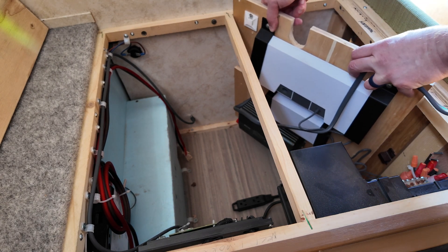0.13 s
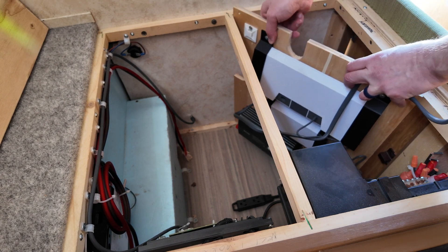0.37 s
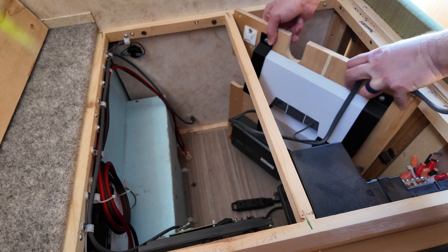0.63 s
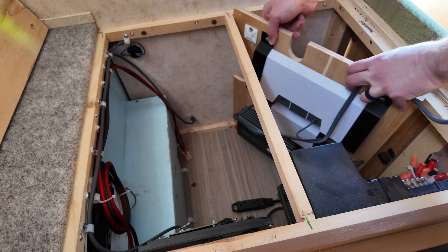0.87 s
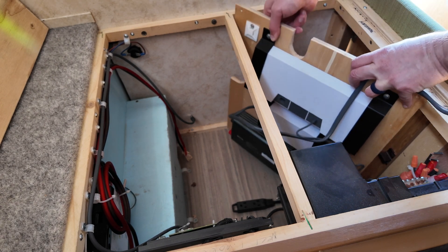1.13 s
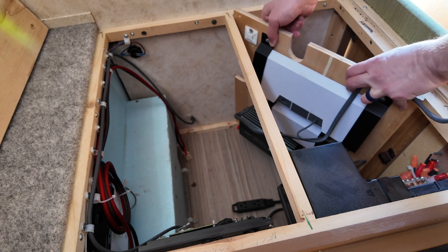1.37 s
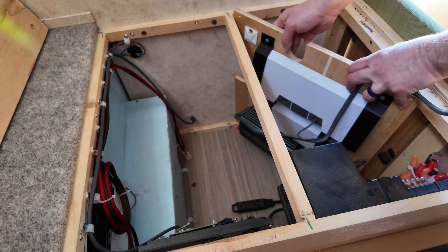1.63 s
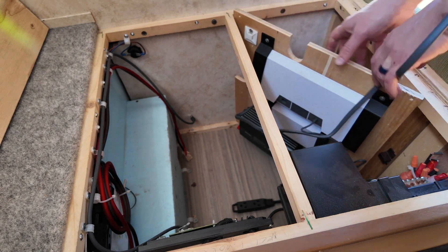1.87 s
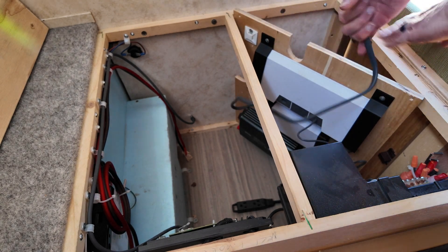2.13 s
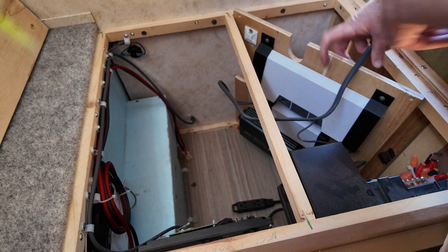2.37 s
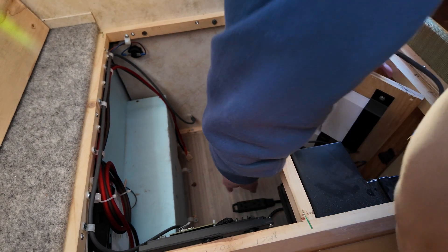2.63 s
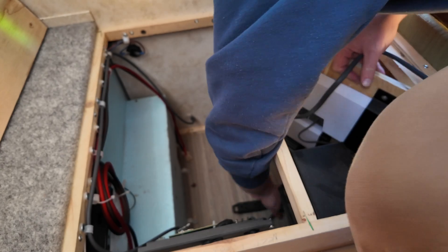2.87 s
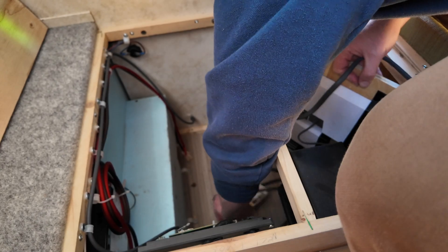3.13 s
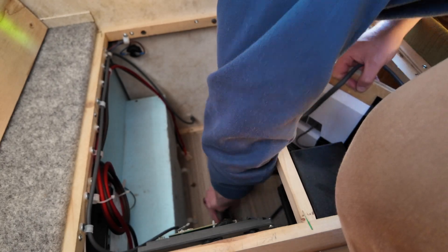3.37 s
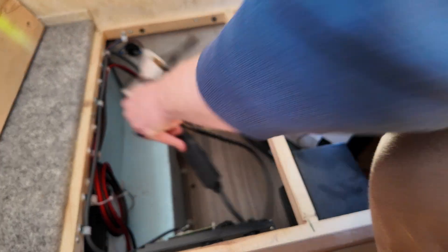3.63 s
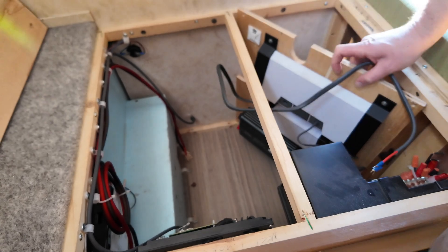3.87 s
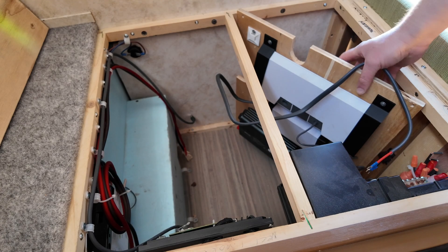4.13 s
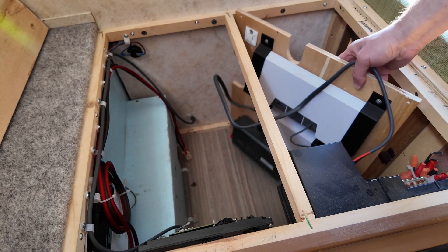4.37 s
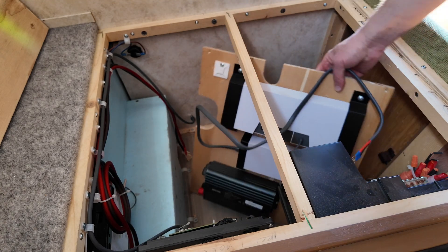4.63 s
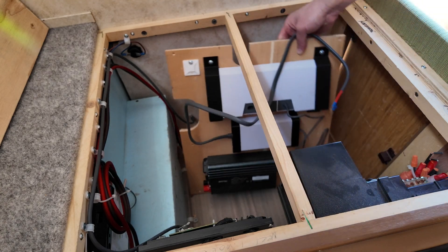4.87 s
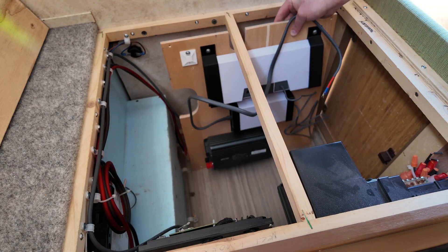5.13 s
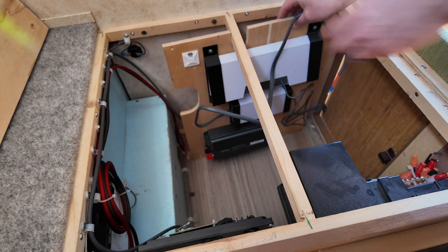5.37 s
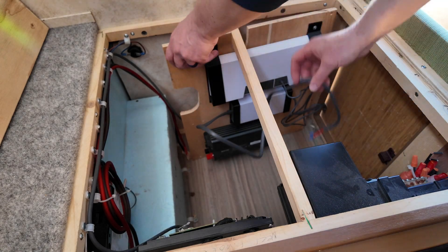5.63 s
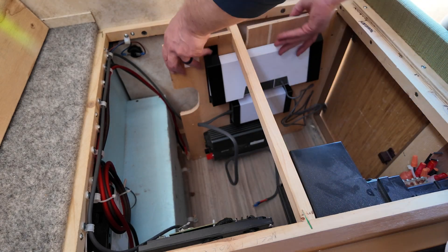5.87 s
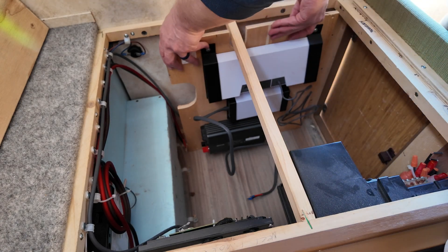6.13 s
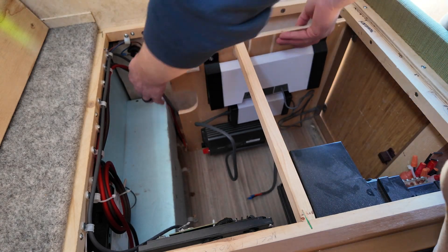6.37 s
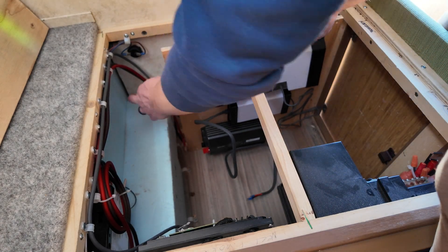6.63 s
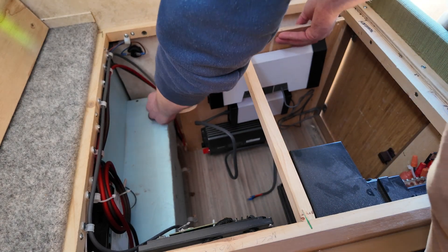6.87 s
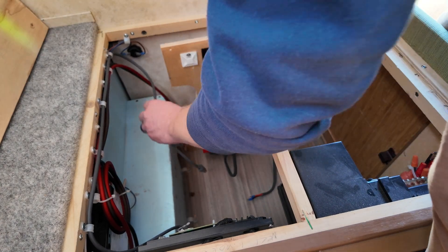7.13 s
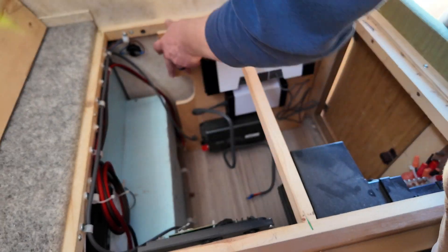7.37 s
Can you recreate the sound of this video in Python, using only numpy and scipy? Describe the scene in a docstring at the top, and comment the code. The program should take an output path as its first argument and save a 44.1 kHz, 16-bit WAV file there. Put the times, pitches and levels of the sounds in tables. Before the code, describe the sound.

Hollow wooden knocks, dull thumps and hard clicks, with short dry scrapes, as a board is worked into a small plywood box.

```python
"""Knocks of a wooden board with equipment, slid into a plywood compartment in a camper.
Each knock is a short chatter of force that rings modes of box, panels, struck part and hard edge.
Scrapes feed random slips to filters and drifting modes, giving rasp, board ring and drone.
Sleeves and cables rustle as shaped noise; coloured noise makes the low cabin rumble."""
import sys
import numpy as np
from scipy import signal
from scipy.fft import rfft, irfft
from scipy.io import wavfile
from scipy.ndimage import uniform_filter1d

SR = 44100
rng = np.random.default_rng(int(sys.argv[2]) if len(sys.argv) > 2 else 0)


def transcribe(signal):
    """Save signal, clipped to [-1, 1], as a 16-bit WAV file at the path in sys.argv[1]."""
    frames = np.atleast_2d(signal).T
    limited = np.clip(frames, -1, 1)
    pcm = np.round(limited * 32767).astype(np.int16)
    wavfile.write(sys.argv[1], SR, pcm)


def undo_db(level):
    """Turn decibels back into plain size, where 20 dB means ten times bigger."""
    steps = np.asarray(level, float) / 20
    return 10 ** steps


N = 330750

# knocks; crack peaks 7 dB above its column: start_s, blow_db, thump_db, crack_db, struck_part_hz
KNOCKS = [(0.003, -31, -23, -46, 293), (0.227, -25, -18.5, -46, 460), (0.318, -27.5, -37, -41, 394),
          (0.664, -20, -45, -51, 272), (0.832, -18, -20, -28.5, 850), (0.839, -9.5, -14.5, -24.5, 295),
          (0.905, -21.5, -23.5, -51, 505), (1.038, -30, -32, -44, 267), (1.111, -34, -33, -44, 314),
          (1.236, -10, -13, -26, 450), (1.43, -30.5, -27, -55, 350), (2.149, -19, -33, -38.5, 486),
          (2.223, -35.5, -47, -32, 430), (2.458, -39.5, -48, -29.5, 297), (2.538, -33.5, -58, -28.5, 1900),
          (2.831, -34, -47, -52, 235), (2.95, -19.5, -45, -62, 262), (3.034, -19.5, -34, -42, 267),
          (3.082, -21, -38, -38, 268), (3.123, -22, -42, -35, 267), (3.2, -25, -42, -56, 268),
          (3.176, -22, -26, -48, 430), (3.236, -24, -19.5, -38, 260), (3.368, -23, -37, -28, 243),
          (3.441, -19, -51, -32.5, 234), (3.503, -13, -44, -29.5, 1070), (3.539, -26.5, -32, -32.5, 252),
          (3.606, -30, -58, -47.5, 392), (3.637, -17, -37, -11.5, 360), (3.778, -28.5, -37, -54, 282),
          (4.186, -31.5, -54, -52, 2350), (4.349, -22, -29, -65, 303), (4.369, -16.5, -23, -40.5, 293),
          (4.448, -13.5, -19, -37.5, 385), (4.464, -50, -60, -29, 3020), (4.468, -19.5, -33, -53, 380),
          (4.614, -11.5, -19, -28.5, 368), (5.818, -15, -32, -19.5, 280), (5.913, -30.5, -57, -34, 270),
          (6.212, -24.5, -63, -61, 323), (6.216, -37.5, -65, -65, 960), (6.285, -33.5, -65, -65, 930),
          (6.285, -25, -62, -61, 330), (6.536, -25.5, -51, -52, 834), (6.571, -20.5, -37, -28, 870),
          (6.666, -7.5, -67, -23, 338), (6.734, -24, -62, -48, 363), (6.88, -19, -50, -36, 363),
          (6.911, -31, -45, -26.5, 273), (6.933, -11.5, -25.5, -27, 336), (6.968, -10.5, -33, -34, 570),
          (7.032, -13, -52, -37.5, 260), (7.28, -16, -38, -30, 630), (7.28, -22, -60, -25, 4070),
          (7.327, -12.5, -55, -37.5, 1000), (7.349, -20, -64, -61, 775), (7.483, -19, -27, -33.5, 327)]
# whole-box modes: pitch_hz, level_db, t60_s
BOX_MODES = [(87.6, 12.5, 0.22), (134, 23, 0.1), (172, 20.5, 0.048)]
# plywood panel modes: pitch_hz, level_db, t60_s
PANEL_MODES = [(262, -7.5, 0.053), (306.7, -4.5, 0.032), (419, 0.5, 0.048), (514, 0, 0.029),
               (697, 7.5, 0.0056), (828, -13.5, 0.031), (942, -7.5, 0.017), (1110, -5, 0.022)]
# hard edge modes: pitch_hz, level_db, t60_s
EDGE_MODES = [(2015, 5, 0.009), (2494, 13, 0.008), (3078, 14, 0.01), (3448, 8, 0.01), (4162, 7, 0.009),
              (4795, 6, 0.01), (6040, -2, 0.006)]
# relative spectrum of the crack noise: freq_hz, level_db
CRACK_SPECTRUM = [(1200, -26.5), (2000, 5.5), (4500, -10), (9000, -22), (15500, -88)]
# relative spectrum of wood rasp: freq_hz, level_db
RASP_SPECTRUM = [(820, -70), (1400, -4), (3100, -4), (7000, -19.5), (9100, -31.5), (15400, -120)]
# relative spectrum of sleeve and cable rustle: freq_hz, level_db
RUSTLE_SPECTRUM = [(1800, -12), (3530, -10.5), (6000, -7.5), (7470, -9), (10200, -14.5), (15800, -27.5)]
# relative spectrum of cabin rumble and air: freq_hz, level_db
CABIN_SPECTRUM = [(15, -43), (25, 18), (76, 4.5), (157, -4), (276, -6), (1550, -27.5), (3220, -29),
                  (6850, -38), (15800, -51)]
# scrapes of wood on wood: start_s, length_s, first_rasp_db, last_rasp_db, drone_over_rasp_db
SCRAPES = [(0.0, 0.06, -62, -53, 18.5), (0.114, 0.08, -50, -54, 18), (0.223, 0.23, -50.5, -56, 6),
           (0.533, 0.054, -55, -42, 7), (0.606, 0.071, -36, -41.5, 11), (0.698, 0.11, -50.5, -62.5, 9),
           (0.833, 0.11, -46, -58, 9), (0.987, 0.23, -53.5, -55, 9.5), (1.251, 0.083, -44, -67, 21),
           (1.353, 0.06, -59, -50, 6), (1.509, 0.046, -53, -70.5, -63), (1.736, 0.081, -58, -67, -39),
           (2.015, 0.15, -70, -49.5, -36), (2.611, 0.051, -72, -45, 10), (2.927, 0.19, -45.5, -42, 18),
           (3.135, 0.12, -40, -40, 10.5), (3.295, 0.098, -52, -49.5, 14.5),
           (3.418, 0.17, -40.5, -61.5, 10.5), (3.62, 0.059, -65, -46, 7.5), (4.158, 0.15, -54, -62, 9.5),
           (4.36, 0.03, -52, -38, 24.5), (4.463, 0.24, -42.5, -46.5, 9.5), (4.746, 0.24, -44.5, -44, 4),
           (4.967, 0.31, -44, -34.5, -2), (5.35, 0.048, -53, -54, 5.5), (5.942, 0.068, -41.5, -45.5, 1.5),
           (6.051, 0.11, -46, -47, 2), (6.187, 0.13, -48.5, -68, 12), (6.502, 0.032, -65, -38, 1),
           (6.579, 0.062, -42, -52, 4.5), (6.665, 0.028, -48, -47, 19.5), (6.766, 0.092, -59.5, -48, 14),
           (6.93, 0.12, -48, -47.5, 15.5)]
# swells of sleeve and cable: middle_s, width_s, rustle_db
BRUSHES = [(0.427, 0.013, -55.5), (0.619, 0.062, -54.5), (2.68, 0.054, -52.5), (3.05, 0.024, -53.5),
           (3.225, 0.015, -47.5), (6.22, 0.049, -59), (6.529, 0.028, -53.5), (6.622, 0.017, -44.5),
           (6.822, 0.017, -51), (7.042, 0.021, -39)]
# faint shifting of hands and cables: time_s, rasp_db
FIDGET = [(0, -66), (.96, -85), (1.55, -66.5), (1.9, -80.5), (2.1, -63), (2.35, -62), (2.65, -57.5),
          (2.9, -59.5), (3.3, -61), (3.72, -78), (3.95, -64.5), (4.3, -72.5), (5.3, -75), (5.45, -61.5),
          (5.8, -64.5), (6.45, -65.5), (6.7, -77), (7.5, -64.5)]
# board dragged clear of the walls, ringing more freely: start_s, end_s
LIFTED = [(0, .7), (4.48, 5.32), (5.92, 6.2)]
# modes of the free board: pitch_hz, level_db, t60_s
FREE_BOARD_MODES = [(475, 3, .035), (1170, 0, .032), (1950, -2, .03), (3200, 3, .022), (4350, 0, .014)]
# shift of the free modes as the board turns and its edge slides: time_s, pitch_factor
BEND = [(4.75, 1), (4.9, 1.07), (5.18, .93), (5.3, 1)]

CABIN_DB = -45
GRIP_S, LET_GO_S = 0.0068, 0.0098  # outside a scrape, each of these spans takes 10 dB off
BOARD_OVER_RASP_DB, GRAIN_OVER_RASP_DB = 5.5, -22  # board ring and fine hiss of a scrape
FIDGET_BOARD_DB, FIDGET_DRONE_DB, FIDGET_RUSTLE_DB = 5, 10, -5.5  # over the fidget rasp
FIDGET_LUMPS_DB = 2  # rms
FREE_OVER_RASP_DB = 1
RUB_TOP_HZ = 6000
DRIFT = .04  # rms share of a mode's pitch
CONTACT_S = 0.0033  # where blow_db equals crack_db
SOFTENING = 0.29  # dB of contact time per dB that crack_db lies under blow_db
PANEL_TOP_HZ, EDGE_TOP_HZ = 2840, 14500  # yielding wood; ring and crack limits fall with longer contact
SNAP = 0.65  # the hard edge feels a push this much shorter than the contact
KNOCK_SIZE = 8820  # samples


def evened(x):
    """Scales to rms 1."""
    return x / np.sqrt(np.mean(x ** 2) + 1e-20)


def peaked(x):
    """Scales to peak 1."""
    return x / np.abs(x).max()


def above(x, hz):
    """Fourth-order high-pass, as small panels radiate little below their lowest modes."""
    return signal.sosfilt(signal.butter(4, hz, "high", fs=SR, output="sos"), x)


def below(x, hz):
    """Second-order low-pass: dulls x above hz."""
    return signal.sosfilt(signal.butter(2, hz, fs=SR, output="sos"), x)


def coloured(x, spectrum):
    """Filters x by freq_hz, level_db points, joined over log frequency."""
    hz, db = np.transpose(spectrum)
    bins_hz = np.fft.rfftfreq(len(x), 1 / SR) + 1  # +1 keeps the log finite
    gain_db = np.interp(np.log(bins_hz), np.log(hz), db, -90, -90)
    return irfft(rfft(x) * undo_db(gain_db), len(x))


def wander(seconds):
    """Slow chance of rms 1: twice-smoothed noise."""
    width = max(int(seconds * SR), 1)
    return evened(uniform_filter1d(uniform_filter1d(rng.standard_normal(N), width), width))


def grit(per_s, spread_db, lump_s, lump_db):
    """Tiny slips of uneven size, coming in lumps."""
    happens = rng.random(N) < per_s / SR
    size_db = spread_db * np.minimum(rng.exponential(1, N), 4)
    slips = rng.standard_normal(N) * happens * undo_db(size_db)
    return evened(slips * undo_db(lump_db * wander(lump_s)))


def motion():
    """Gains of rasp, board, drone and rustle: fidgeting, scrapes and brushes add their powers."""
    seconds = np.arange(N) / SR
    t = np.arange(0, N + 64, 64) / SR
    lumps = np.interp(t, seconds, wander(0.21))
    fidget_db = np.interp(t, *np.transpose(FIDGET)) + FIDGET_LUMPS_DB * lumps
    power = undo_db(2 * (fidget_db + np.c_[[0, FIDGET_BOARD_DB, FIDGET_DRONE_DB, FIDGET_RUSTLE_DB]]))
    for start, length, first_db, last_db, drone_db in SCRAPES:
        before = np.maximum((start - t) / GRIP_S, 0)
        after = np.maximum((t - start - length) / LET_GO_S, 0)
        progress = np.clip((t - start) / length, 0, 1)
        db = first_db + (last_db - first_db) * progress - 10 * np.minimum(before + after, 20)
        power += undo_db(2 * (db + np.c_[[0, BOARD_OVER_RASP_DB, drone_db, GRAIN_OVER_RASP_DB]]))
    for middle, width, db in BRUSHES:
        power[3] += undo_db(2 * db) * np.exp(-2 * ((t - middle) / width) ** 2)
    return [np.interp(seconds, t, gain) for gain in np.sqrt(power)]


def rubbed(drive, modes, low_hz, bend=1):
    """As the contact travels, each mode drifts in pitch and is fed now more, now less."""
    out = np.zeros(N)
    for mode_hz, db, t60 in modes:
        pitch_hz = mode_hz * bend * (1 + DRIFT * wander(.12))
        turn = np.exp(2j * np.pi * np.cumsum(pitch_hz) / SR)
        feed = drive * undo_db(2 * wander(.1)) / turn
        # one-pole decay in the frame that turns with the mode
        ring = signal.lfilter([1], [1, -undo_db(-60 / np.abs(t60) / SR)], feed)
        out += undo_db(db) * (ring * turn).imag
    return evened(below(above(out, low_hz), RUB_TOP_HZ))


def rubbing():
    """Slips along the grain rasp and ring the edge and board; pressure drones in the box; cloth whispers."""
    rasp_gain, board_gain, drone_gain, rustle_gain = motion()
    slips = grit(7000, 2.2, .005, 2.2)
    shudder = grit(2500, 2.5, .012, 2.4)
    bend = np.interp(np.arange(N) / SR, *np.transpose(BEND))
    # rolled or flipped slips keep the layers independent
    edge = rubbed(np.roll(slips, SR), EDGE_MODES, 1300)
    rasp = evened(evened(coloured(slips, RASP_SPECTRUM)) + .8 * edge)
    board = rubbed(shudder + .5 * slips, PANEL_MODES[2:], 276)
    low_panels = rubbed(shudder, PANEL_MODES[:2], 172)
    drone = evened(low_panels + 0.21 * rubbed(shudder, BOX_MODES, 60))
    rustle = evened(coloured(slips + grit(14000, 1.5, .012, 1.8), RUSTLE_SPECTRUM))
    lifted = np.searchsorted(np.ravel(LIFTED), np.arange(1, N + 1) / SR) % 2  # 1 inside a span
    free_board = rubbed(np.flip(slips), FREE_BOARD_MODES, 270, bend)
    rasp = rasp + lifted * undo_db(FREE_OVER_RASP_DB) * free_board
    return rasp_gain * rasp + board_gain * board + drone_gain * drone + rustle_gain * rustle


def cabin():
    """Low rumble and faint air of the closed cabin: dense lumpy noise, coloured."""
    return undo_db(CABIN_DB) * evened(coloured(grit(32000, 0.2, 0.029, 7.1), CABIN_SPECTRUM))


def rings(modes, size):
    """One dying sine for each mode."""
    hz, db, t60 = np.transpose(modes)[:, :, None]
    t = np.arange(size) / SR
    return undo_db(db - 60 * t / np.abs(t60)) * np.sin(2 * np.pi * hz * t)


def hit(drive, body, low_hz):
    """Force convolved with a body's ring, high-passed, at peak 1."""
    return peaked(above(signal.fftconvolve(drive, body)[:len(drive)], low_hz))


def knock(row, chance):
    """A short chatter of contact forces rings the box, its panels, the struck part and the hard edge."""
    _, blow_db, thump_db, crack_db, part_hz = row
    size = chance.shape[1]
    contact_s = np.clip(CONTACT_S * undo_db(SOFTENING * (blow_db - crack_db)), .001, .012)
    stretch = CONTACT_S / contact_s
    u = np.arange(size) / SR / contact_s  # time in contacts
    shape = (1 - np.exp(-u / 0.21)) ** 2 * np.exp(-u)
    # loose parts chatter on
    rattle = undo_db(-20.5) * chance[1] * (1 - np.exp(-u)) * np.exp(-u * contact_s / 0.0073)
    force = shape * (0.053 + chance[0]) + rattle
    push = shape * (1.9 + chance[0])  # the heavy box feels mostly the overall push
    snap = (1 - np.exp(-u / SNAP / 0.055)) * np.exp(-u / SNAP)

    thump = hit(below(push, PANEL_TOP_HZ), rings(BOX_MODES, size).sum(0), 26)

    part_modes = [(part_hz, 10, 10 / part_hz + 0.008), (part_hz * 1.36, 3, .014)]
    panel = undo_db(2.5 * chance[2, :len(PANEL_MODES)]) @ rings(PANEL_MODES, size)
    panel = panel + rings(part_modes, size).sum(0)
    # soft blows ring only the low modes
    soft_hz = min(max(PANEL_TOP_HZ * stretch, 2 * part_hz), SR / 3)
    blow = hit(below(force, soft_hz), panel, 243)

    edge = undo_db(5 * chance[3, :len(EDGE_MODES)]) @ rings(EDGE_MODES, size)
    edge_ring = hit(snap * chance[0] + rattle, edge, 1050)
    crack = edge_ring + peaked(coloured(chance[1], CRACK_SPECTRUM) * snap)
    # longer contact, duller crack
    crack = peaked(below(below(crack, min(EDGE_TOP_HZ * stretch, SR / 3)), 10000))
    return undo_db(thump_db) * thump + undo_db(blow_db) * blow + undo_db(crack_db + 7.0) * crack


def knocks():
    """All knocks in their places, each with its own random force and mode levels."""
    chance = rng.standard_normal((len(KNOCKS), 4, KNOCK_SIZE))
    out = np.zeros(N + KNOCK_SIZE)
    for row, draw in zip(KNOCKS, chance):
        at = max(round(row[0] * SR) - 30, 0)  # 30 samples early, for the rise of the force
        out[at:at + KNOCK_SIZE] += knock(row, draw)
    return out[:N]


def compartment(x):
    """Close plywood walls give a short dense echo: sparse random taps, 60 dB down in 0.04 s."""
    t = np.arange(4410) / SR
    present = (rng.random(len(t)) < .06) * (t > .0015)
    taps = rng.standard_normal(len(t)) * present * undo_db(-60 * t / 0.04)
    return x + undo_db(-9.5) * signal.oaconvolve(x, taps / np.linalg.norm(taps))[:N]


def scene():
    """Knocks and rubbing inside the compartment, over the cabin's rumble."""
    return (compartment(knocks() + rubbing()) + cabin())[None]


def roll_off(x):
    """The treble ends steeply here."""
    return signal.sosfilt(signal.butter(12, 15830, fs=SR, output="sos"), x)


def record(dry):
    """The microphone drops the deepest bass and softly squashes the hardest knocks."""
    ceiling = .45
    mix = ceiling * np.tanh(above(dry, 75.7) / ceiling)
    return roll_off(mix)


dry = scene()
out = record(dry)
transcribe(out)
```